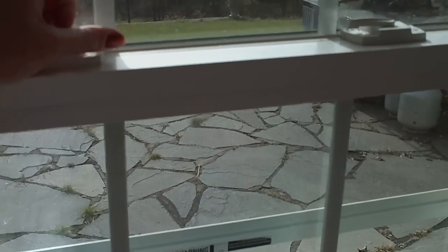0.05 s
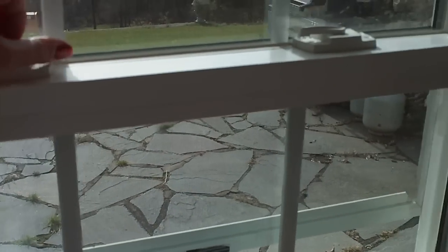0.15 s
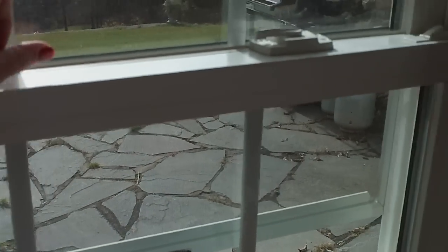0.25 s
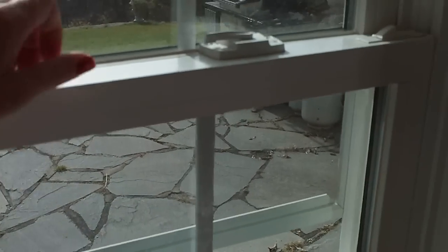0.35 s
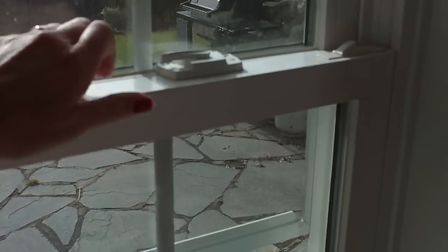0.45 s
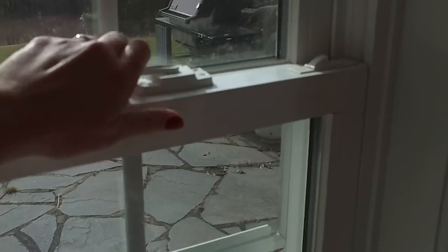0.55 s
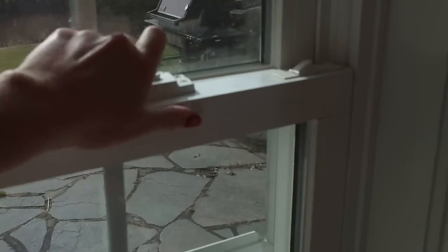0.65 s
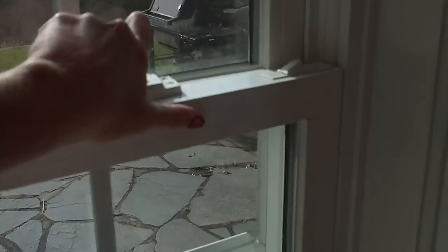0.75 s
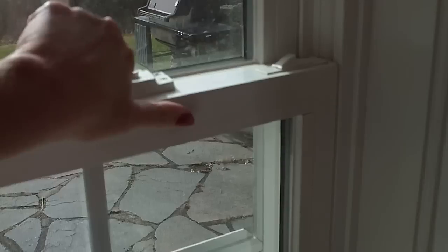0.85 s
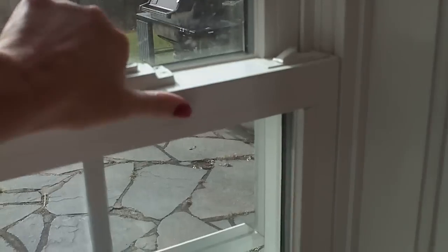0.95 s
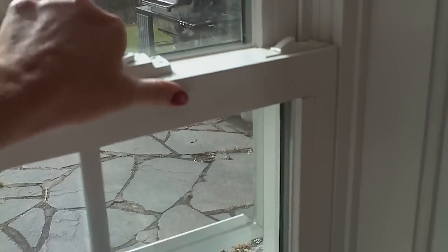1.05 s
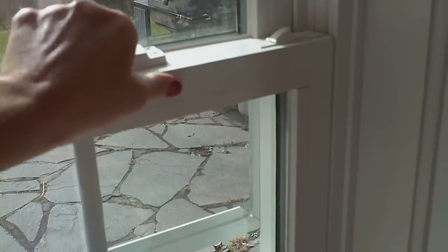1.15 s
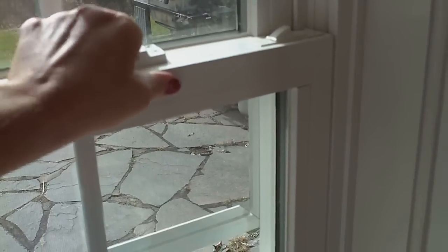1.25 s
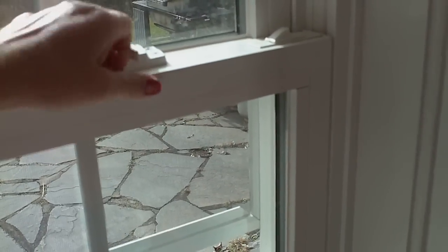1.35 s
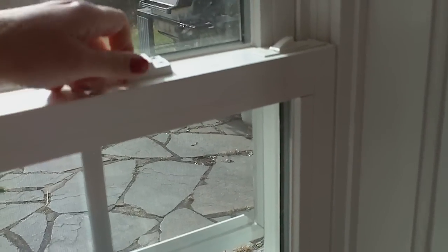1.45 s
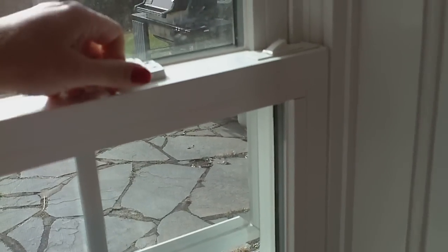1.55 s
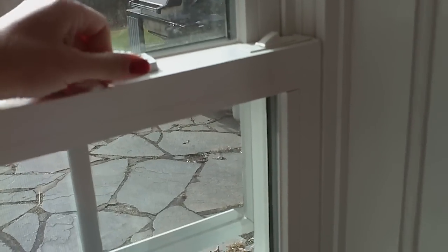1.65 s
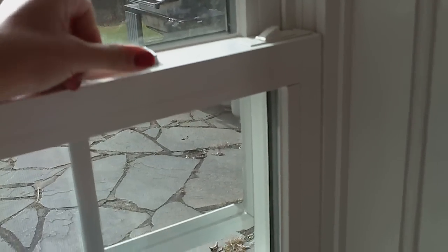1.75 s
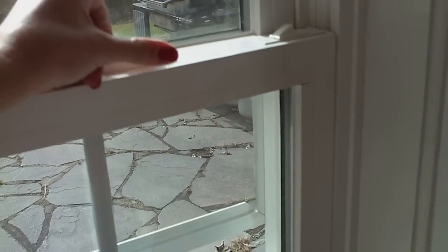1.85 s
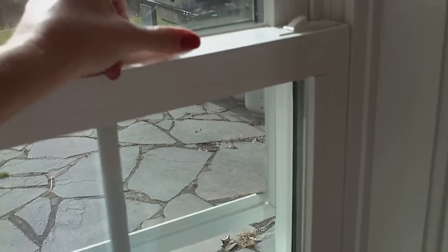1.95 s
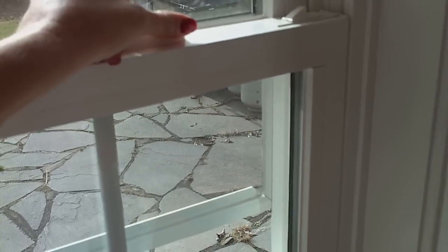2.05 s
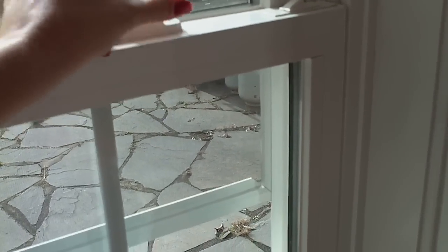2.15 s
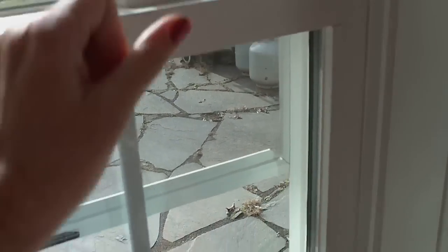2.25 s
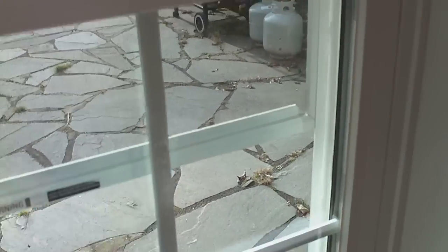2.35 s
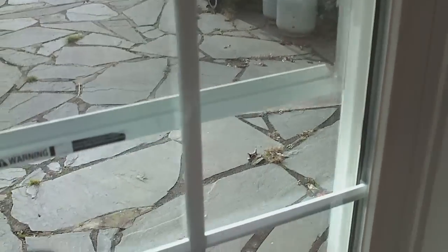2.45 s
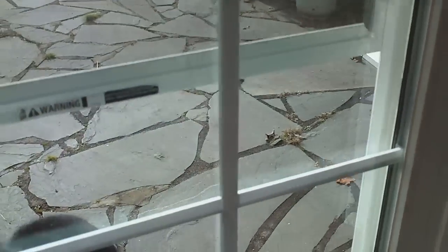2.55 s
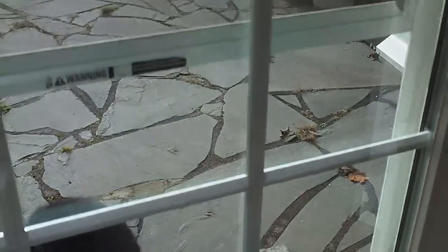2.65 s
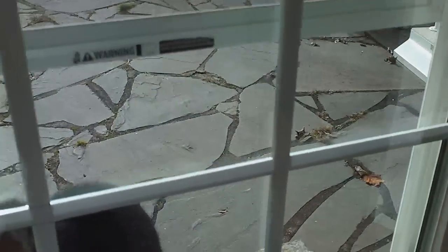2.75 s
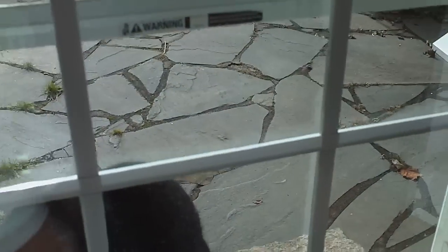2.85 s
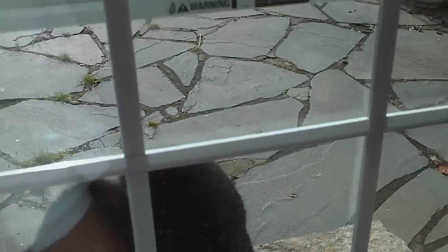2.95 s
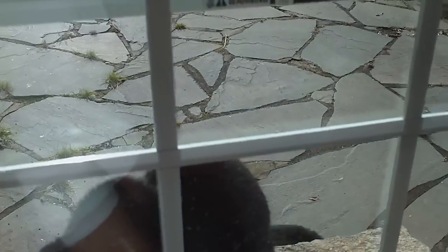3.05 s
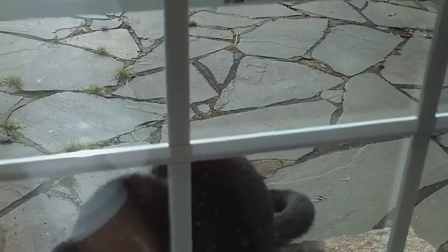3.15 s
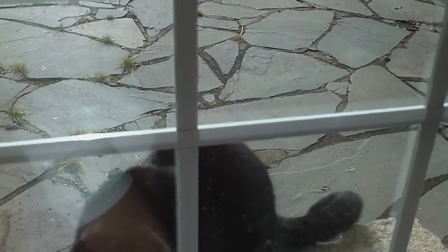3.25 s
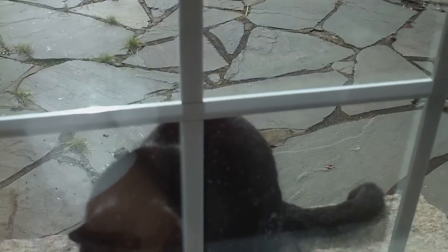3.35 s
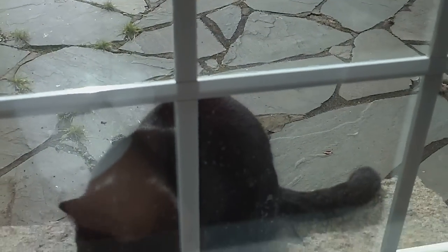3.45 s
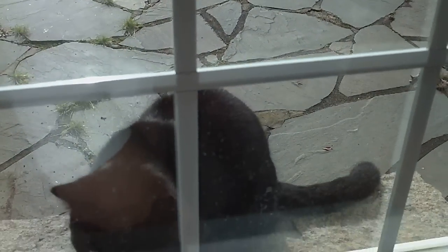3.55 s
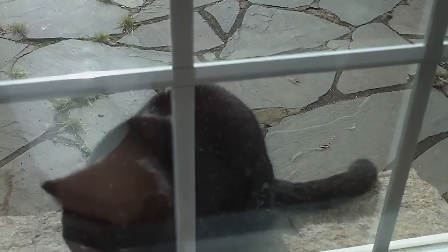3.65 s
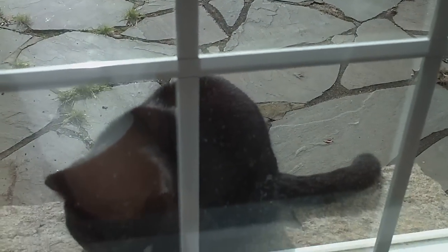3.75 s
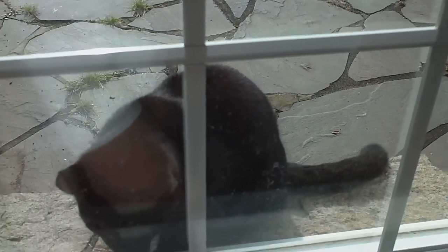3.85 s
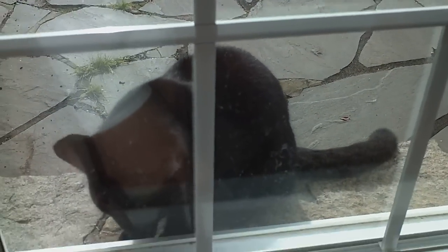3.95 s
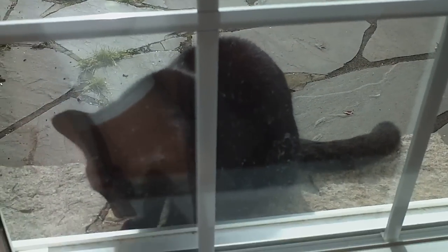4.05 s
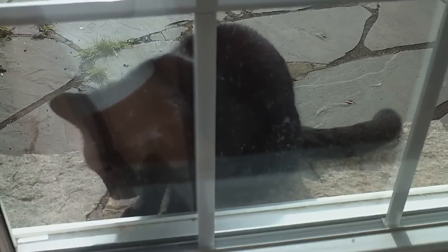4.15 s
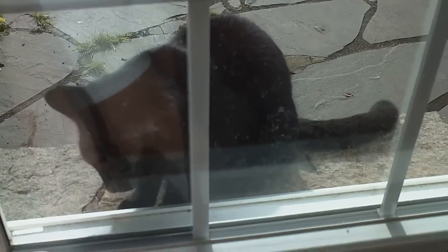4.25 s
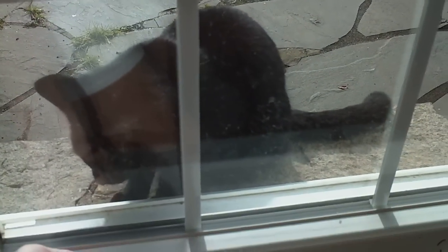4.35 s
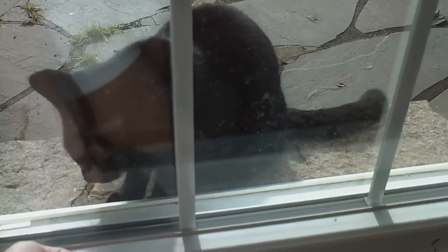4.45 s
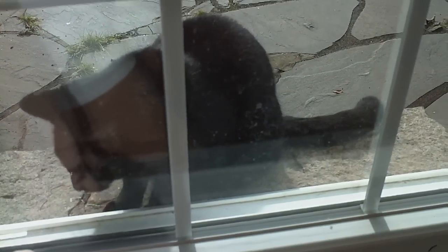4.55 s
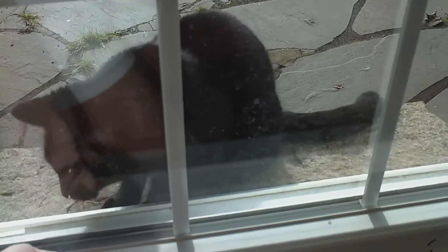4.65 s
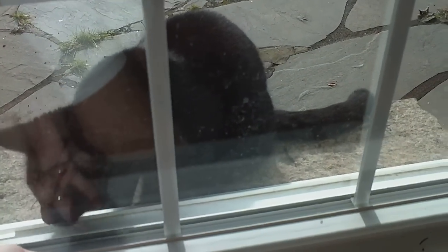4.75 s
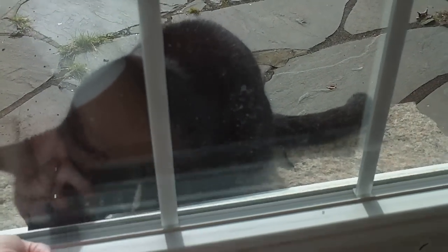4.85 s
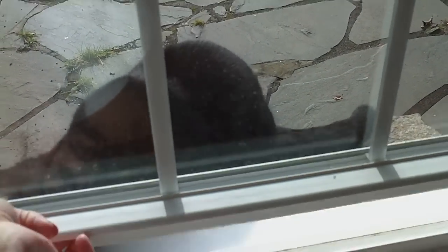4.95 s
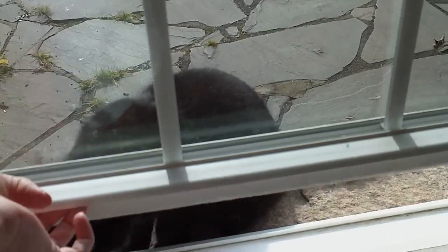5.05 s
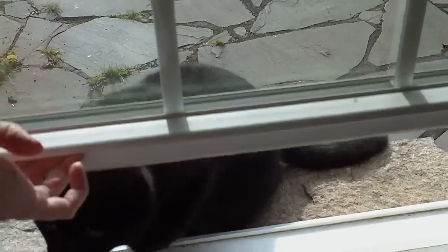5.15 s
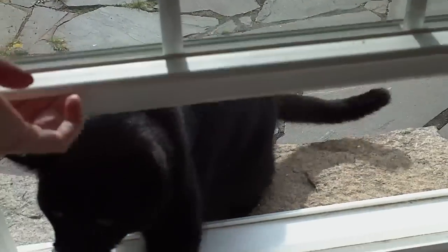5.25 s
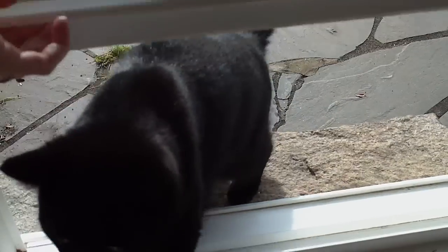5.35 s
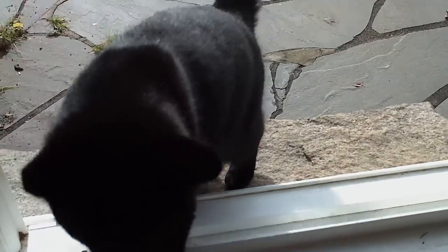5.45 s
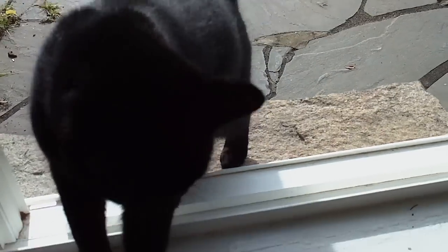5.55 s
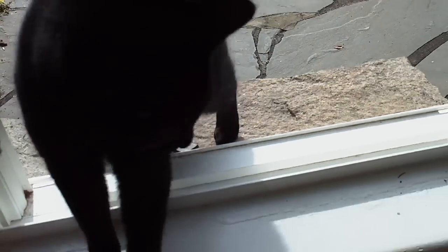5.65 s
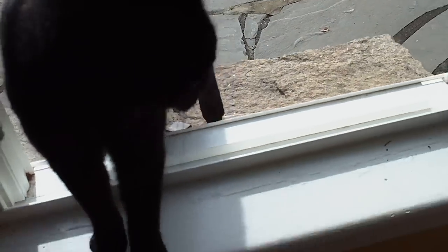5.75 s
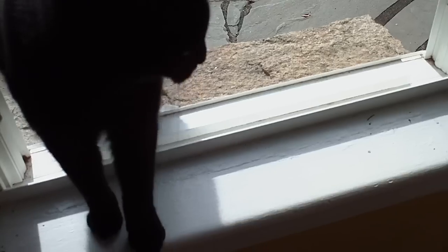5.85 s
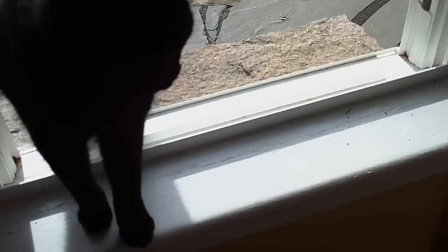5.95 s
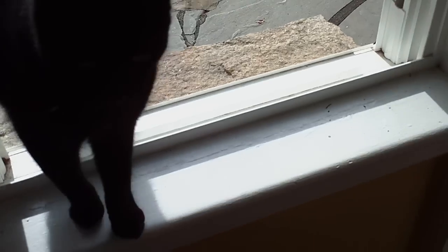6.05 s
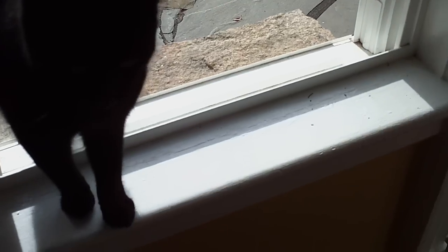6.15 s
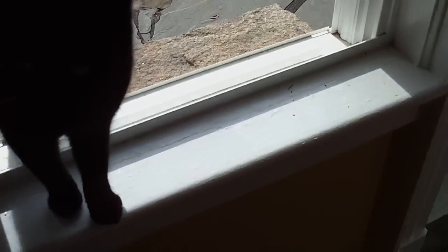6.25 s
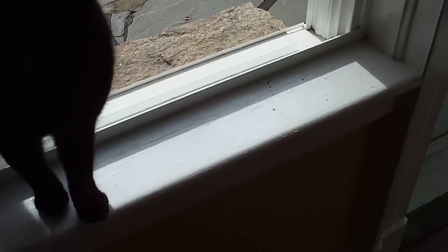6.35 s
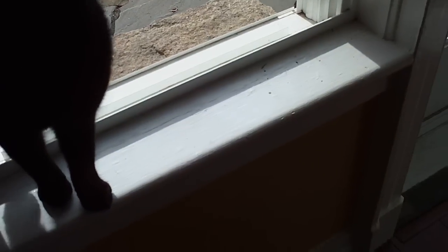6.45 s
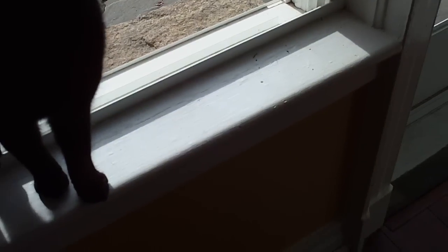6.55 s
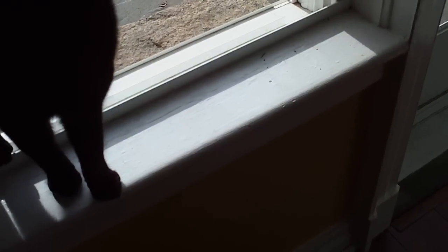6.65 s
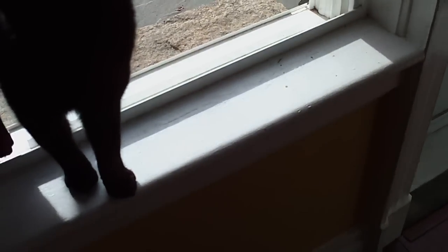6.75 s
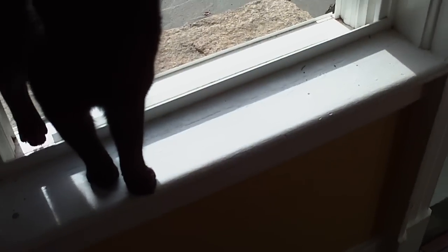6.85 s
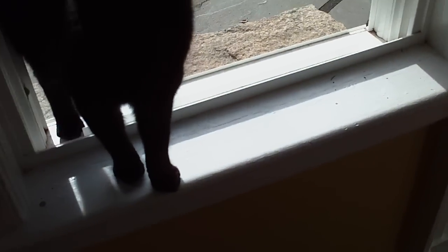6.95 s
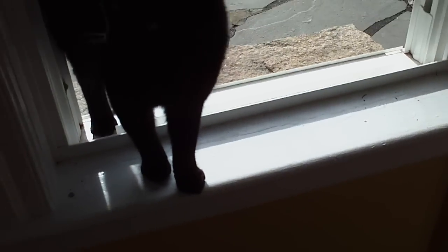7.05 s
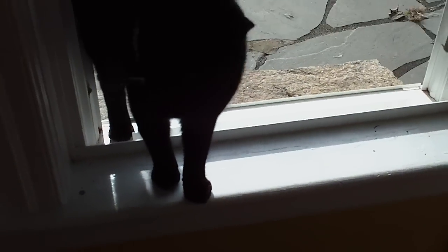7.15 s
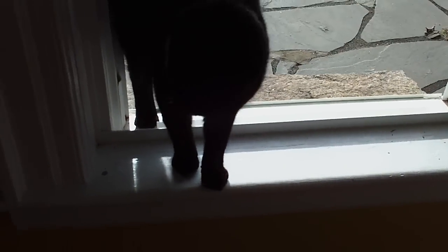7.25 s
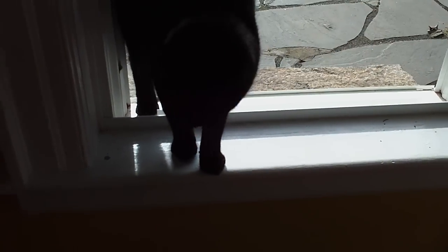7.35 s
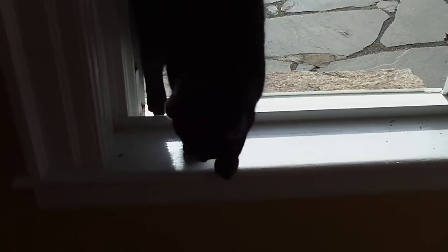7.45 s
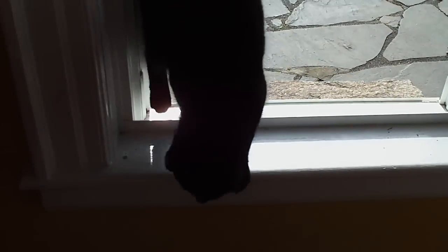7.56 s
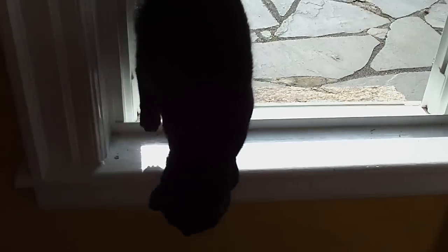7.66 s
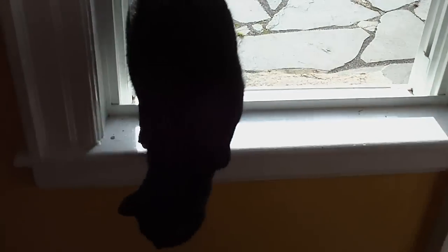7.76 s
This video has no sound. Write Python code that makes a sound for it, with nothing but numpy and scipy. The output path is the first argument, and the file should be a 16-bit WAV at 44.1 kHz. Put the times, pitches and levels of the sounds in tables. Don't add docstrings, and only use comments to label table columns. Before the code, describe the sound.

Close hard clicks, a thump on the frame, a loud clattering window slide, then soft cat scuffs and claw clicks over a low aircraft hum.

```python
import sys
import numpy as np
from scipy import signal
from scipy.fft import rfft, irfft
from scipy.io import wavfile
from scipy.ndimage import uniform_filter1d

SR = 44100
rng = np.random.default_rng(int(sys.argv[2]) if len(sys.argv) > 2 else 0)


def invert_db(level):
    return 10 ** (np.asarray(level, dtype=float) / 20)


def log_audio(samples):
    frames = np.atleast_2d(samples).T
    limited = np.clip(frames, -1, 1)
    pcm = np.round(limited * 32767).astype(np.int16)
    wavfile.write(sys.argv[1], SR, pcm)


N = 343980
LEAD = 2048


def on_log(hz, points):
    f, v = np.transpose(points)
    return np.interp(np.log(np.clip(hz, 1, 6800)), np.log(f), v)


def band(x, lo_hz, hi_hz):
    return signal.sosfilt(signal.butter(2, [lo_hz, hi_hz], "band", fs=SR, output="sos"), x)


def unit(x):
    return x / np.sqrt(np.mean(x ** 2))


def walk(rate_hz):
    k = int(SR / rate_hz)
    levels = np.repeat(rng.standard_normal(N // k + 1), k)
    return uniform_filter1d(levels, k)[:N]


def curves(table):
    s, *columns = np.transpose(table)
    return [np.interp(np.arange(N) / SR, s, c) for c in columns]


def causal(db):
    c = irfft(db * np.log(10) / 20)
    c[1:len(c) // 2] *= 2
    c[len(c) // 2 + 1:] = 0
    return np.exp(rfft(c))


def contacts(events, colour, rings=()):
    out, size = np.zeros(N + LEAD + SR), 16384
    t, hz = np.arange(size) / SR, np.arange(size // 2 + 1) * SR / size
    peaks = sum(invert_db(2 * (db + 2.0)) / (1 + (2 * (hz - f) / width) ** 2) ** 2 for f, width, db in rings)
    part_db = 10 * np.log10(invert_db(2 * on_log(hz, colour)) + peaks)
    for s, peak_db, boom_db, crack_db, chatter_ms in events:
        x = t / (max(chatter_ms, .5) / 1000)
        chance = rng.random((2, size))
        hits = (chance[0] < 0.11) * (chance[1] - .5)
        swarm = rfft(hits * (x + 0.15) ** 1.99 * np.exp(-3.5 * x))
        swarm = swarm / (np.abs(swarm) + 1e-9)
        touch = [(45, boom_db - 13.5), (85, boom_db), (300, boom_db), (1200, 0.0024), (4000, crack_db)]
        hit = irfft(swarm * causal(part_db + on_log(hz, touch))) * np.exp(-t / 0.15)
        at = int(s * SR) + LEAD
        out[at:at + size] += invert_db(peak_db) * hit / np.abs(hit).max()
    return out[:N + LEAD]


def strokes(rows, under_db):
    attack_s, rise_share, fall_db_s = 0.029, 0.24, 146.5
    t = np.arange(N) / SR
    power = 0 * t + np.reshape(invert_db(2 * np.array(under_db)), (-1, 1))
    for s, hold, db, *zones_db in rows:
        rise = np.clip((t - s) / (attack_s + rise_share * hold), 0, 1)
        fall_db = fall_db_s * np.maximum(t - s - attack_s - hold, 0)
        zones = invert_db(np.array([0, *zones_db]))[:, None]
        power = power + (rise * invert_db(db - fall_db) * zones) ** 2
    return power


def rubbing(power, colour):
    scrape_db, hiss_db, rumble_db = 10 * np.log10(power)
    bursts_db = 2.5 * np.minimum(rng.exponential(size=(3, N)), 4)
    grains = rng.standard_normal((3, N)) * invert_db(bursts_db)
    response = irfft(causal(on_log(np.arange(1025) * SR / 2048, colour)))
    shaped = signal.fftconvolve(grains, response[None], axes=1)[:, :N]
    slip = walk(35)
    scrape = unit(band(shaped[0], 600, 2500)) * invert_db(scrape_db + 1.1 * slip)
    hiss = unit(band(shaped[1], 4200, 9000)) * invert_db(hiss_db + 1.3 * slip + 1.2 * walk(25))
    rumble = unit(band(shaped[2], 250, 510)) * invert_db(rumble_db + 2.2 * slip + 0.88 * walk(25))
    return scrape + hiss + rumble


# start_s, peak_db, boom_db, crack_db, chatter_ms
BUMP_HITS = [
    (-.02, -2.5, -6.5, -7.5, 11),
]
# pitch_hz, level_db per Hz
BUMP_COLOUR = [(35, -39), (60, -6), (91, 10.5), (230, -11.5), (410, -7.5), (691, -21), (795, -11.5),
               (2700, -27), (5660, -20), (7200, -26), (9360, -61), (15800, -120)]


def earlier_bump():
    return contacts(BUMP_HITS, BUMP_COLOUR)


# pitch_hz, width_hz, level_db
PANE_MODES = [(30.7, 3.65, -1), (88.8, 3.3, -13.5), (128, 22, -1.5)]
# start_s, peak_db
PANE_THUDS = [(-.02, -14.5), (.117, -26), (0.723, -43), (1.026, -51), (1.151, -37), (1.874, -36),
              (2.058, -18), (4.138, -38.5), (4.49, -41), (4.538, -22.5), (4.882, -26), (4.953, -16),
              (4.996, -17.5)]


def ring(modes, t, scatter_db):
    hz, width, db = np.transpose(modes)[:, :, None]
    chance = rng.standard_normal((3, len(modes), 1))
    wave = np.sin(2 * np.pi * hz * (1 + 0.0095 * chance[0]) * t + chance[1])
    return np.sum(invert_db(db + scatter_db * chance[2]) * np.exp(-np.pi * width * t) * wave, axis=0)


def glass_pane():
    out, t = np.zeros(N + LEAD + SR), np.arange(16384) / SR
    for s, db in PANE_THUDS:
        thud = ring(PANE_MODES, t, 0.54) * (1 - np.exp(-t / 0.0017))
        at = int(s * SR) + LEAD
        out[at:at + len(t)] += invert_db(db) * thud / np.abs(thud).max()
    return out[:N + LEAD]


# pitch_hz, level_db per Hz
HISS_COLOUR = [(15, -39), (25, -10.5), (43, -10), (93, -3), (118, -14), (142, -9.5), (282, -14.5),
               (401, -21.5), (473, -12), (1300, -16.5), (5450, -19), (6900, -24), (8970, -56),
               (15200, -120)]
# start_s, hold_s, level_db
HAND_JERKS = [(0, 0.023, -25), (.95, 0.26, -48), (1.5, 0.28, -47.5), (2.1, 0.1, -42), (2.45, 0.09, -52),
              (4.5, 0.3, -50), (5.05, .04, -33), (5.25, 0.041, -64)]


def camera():
    gain = invert_db(on_log(np.arange(N // 2 + 1) * SR / N, HISS_COLOUR))
    hiss = unit(irfft(rfft(rng.standard_normal(N)) * gain, N)) * invert_db(-50)
    wobble = unit(band(band(rng.standard_normal(N), 24, 40), 22, 42))
    tremor_db = -63.5
    grip = np.sqrt(strokes(HAND_JERKS, [tremor_db])[0])
    return hiss + wobble * grip * invert_db(1.5 * walk(2.3))


# start_s, blade_rate_hz, level_db, overtones_db over it
DRONE = [(0, 97.2, -70.5, 7), (.7, 94.5, -70.5, 14.5), (1.4, 94.3, -62.5, 14.5), (2.4, 94.35, -51, -4.5),
         (2.8, 94.2, -51, 2.5), (3.4, 93.5, -54, -1), (3.9, 92.4, -53, -0.5), (4.3, 91.9, -47.5, -8.5),
         (5.25, 91.5, -41, -2.5), (5.7, 87.1, -45, 1), (5.95, 89.2, -48, 2.5), (6.45, 86.9, -49, 4.5),
         (6.85, 87.7, -48.5, -1), (7.25, 85.1, -44.5, -9), (7.55, 87.9, -47, -9.5), (7.8, 87.2, -42.5, -5)]
# start_s, level_db
ENGINE_NOTE = [(0, -61), (2, -67.5), (4.4, -66.5), (5.6, -47.5), (5.85, -48.5), (6.1, -56), (7.0, -61),
               (7.8, -54)]
OVERTONE_LEVELS = [-7, -9, -21]
OPEN_GAINS = [2.5, 1, 15.5]


def plane():
    hz, level_db, over_db = curves(DRONE)
    phase = 2 * np.pi * np.cumsum(hz) / SR
    opens_s, opening_s, flutter_db = 5.82, 0.12, 1.2
    clear = np.clip((np.arange(N) / SR - opens_s) / opening_s, 0, 1)
    lines = [(1, level_db)]
    for k, (start_db, gain_db) in enumerate(zip(OVERTONE_LEVELS, OPEN_GAINS), 2):
        lines.append((k, level_db + over_db + start_db + gain_db * clear + 1.3 * walk(3.7)))
    lines.append((3 / 2, curves(ENGINE_NOTE)[0]))
    return sum(np.sqrt(2) * invert_db(db + flutter_db * walk(22)) * np.sin(k * phase + k ** 2) for k, db in lines)


# start_s, peak_db, boom_db, crack_db, chatter_ms
LATCH_HITS = [
    (0.1175, -7.5, -2, 2, 7.7),
    (0.1215, 5.5, -10, 5.5, 3.2),
    (0.126, -3.5, -1.5, -5, 2.9),
    (0.529, -37, -16.5, -1.5, 3.1),
]
# pitch_hz, level_db per Hz
LATCH_COLOUR = [(35, -46.5), (60, -32), (286, -19.5), (472, -2.5), (566, -12.5), (705, -2.5), (811, -9.5),
                (1000, 2), (1280, -9), (1700, -3.5), (2250, -11.5), (2750, -22.5), (3400, -18.5),
                (5660, -20), (7200, -37)]
# pitch_hz, width_hz, level_db
LATCH_NOTES = [(700, 18, -1.5), (952, 53, 1), (1100, 50, -8.5), (1740, 100, -10), (2230, 150, -14.5),
               (4320, 100, -20)]


def first_latch():
    return contacts(LATCH_HITS, LATCH_COLOUR, LATCH_NOTES)


# start_s, hold_s, scrape_db, hiss_db over scrape, rumble_db over scrape
HAND_RUBS = [(.3, 0.034, -48.5, -17, -23), (.66, 0.04, -58, 1, 15), (.97, 0.092, -46, -10.5, -7),
             (1.3, 0.3, -55, -1.5, -5), (2.2, 0.8, -68, 1, 12), (3.42, 0.2, -61, -3.5, 9),
             (4.53, 0.044, -47, 16, -21), (4.8, 0.12, -58, 16.5, 2)]
# start_s, scrape_db
SASH_SLIDE = [(4.8, -77), (4.9, -19.5), (5.16, -33.5), (5.3, -34.5), (5.41, -33.5), (5.48, -35.5),
              (5.56, -33.5), (5.62, -36), (5.76, -38.5), (5.85, -51), (6.25, -51.5)]
# scrape_db, hiss_db, rumble_db
SLIDE_ZONES = [0.5, -0.5, -6]
# scrape_db, hiss_db, rumble_db
FIDGET = [-71.5, -57.5, -56.5]
# pitch_hz, level_db per Hz
TRACK_COLOUR = [(120, -44.5), (200, -1), (472, -1), (730, -7.5), (986, -2.5), (2000, -16), (2420, -13),
                (3440, -24.5), (4500, -27.5), (5100, -28), (5650, -25), (6570, -26.5), (7300, -38.5)]


def hands_and_slide():
    slide_db = curves(SASH_SLIDE)[0] + np.array(SLIDE_ZONES)[:, None]
    return rubbing(strokes(HAND_RUBS, FIDGET) + invert_db(2 * slide_db), TRACK_COLOUR)


# start_s, peak_db, boom_db, crack_db, chatter_ms
FINGER_HITS = [
    (0.704, -50, 14, 11, 7.6),
    (0.726, -34, -19, 6, 7.2),
    (0.854, -41, 27, -10, 12),
    (1.534, -30, 16, -1, 9.7),
    (1.6, -39.5, 2, -10.5, 8.3),
]
# pitch_hz, level_db per Hz
SKIN_COLOUR = [(88, -38), (150, -14), (270, -5), (335, -11), (414, 3.5), (596, -16.5), (1190, -14),
               (3000, -33), (3900, -59), (6600, -120)]


def fingers():
    return contacts(FINGER_HITS, SKIN_COLOUR)


# start_s, peak_db, boom_db, crack_db, chatter_ms
CAM_HITS = [(0.974, -31, -7, -10.5, 4.3), (0.985, -25, -7.5, -9, 8), (1.011, -30, -11, 0.5, 7.6),
            (1.023, -30.5, -8, 12.5, 6.1), (1.051, -27, -7, 15.5, 5.5), (1.1558, 1.5, -6.5, -2.5, 3.5),
            (1.1585, 0.5, -6.5, 5, 5), (1.163, -9, -7.5, -11, 5), (1.169, -9.5, 4, -12.5, 5.7)]
# pitch_hz, level_db per Hz
CAM_COLOUR = [(35, -54), (60, -8), (123, -4.5), (234, -16.5), (402, -0.5), (625, -16.5), (719, -13),
              (1070, -12), (2120, -21), (2390, -23), (2750, -29), (5780, -21), (7200, -36), (9360, -72.5),
              (15800, -120)]
# pitch_hz, width_hz, level_db
CAM_NOTES = [(205, 120, -10.5), (405, 70, -4.5), (1050, 200, -12.5), (1420, 120, -12), (2330, 130, -22)]


def second_latch():
    return contacts(CAM_HITS, CAM_COLOUR, CAM_NOTES)


# start_s, peak_db, boom_db, crack_db, chatter_ms
TICK_HITS = [
    (1.843, -31, 15, 0, 8.3),
    (1.874, -20.5, 6.5, 0.5, 6.2),
    (1.93, -13, 0, -3.7, 9.3),
]
# pitch_hz, level_db per Hz
RAIL_COLOUR = [(35, -51.5), (60, -10.5), (234, -11.5), (270, -6.5), (664, -10.5), (933, -2.5), (1140, -9.5),
               (1740, -6), (2870, -26.5), (7200, -28), (9360, -55), (15800, -120)]


def rail_ticks():
    return contacts(TICK_HITS, RAIL_COLOUR)


# start_s, peak_db, boom_db, crack_db, chatter_ms
THUMP_HITS = [
    (2.0465, -11, 12, 13.5, 6.7),
    (2.0545, -6, -3, 16, 4.3),
    (2.0595, -5.5, 0, 5, 5),
]
# pitch_hz, level_db per Hz
FRAME_COLOUR = [(35, -43.5), (60, 8), (239, -6.5), (410, -1), (589, -10.5), (1000, -7), (1700, -7.5),
                (2050, -15), (2460, -12), (2850, -24), (3600, -23), (5120, -20.5), (6000, -22), (7200, -42)]
# pitch_hz, width_hz, level_db
FRAME_NOTES = [(200, 54, -4), (268, 17, -15), (417, 34, -12), (2485, 100, -15), (3540, 300, -20.5)]


def rail_thumps():
    return contacts(THUMP_HITS, FRAME_COLOUR, FRAME_NOTES)


# start_s, peak_db, boom_db, crack_db, chatter_ms
SILL_TAPS = [(2.698, -31, 11.5, -4, 16), (2.997, -35, 3, 1.5, 8.4), (3.22, -32, -7.5, 12, 20),
             (3.5295, -19.5, 0, -4, 7.1), (3.54, -26.5, 5, -8, 10), (3.615, -35, -7.5, 5, 30),
             (3.759, -34, 3, -20, 1.4), (3.8115, -30.5, 3, -6.5, 5.7), (3.835, -36, 4, 2.5, 8.7),
             (4.101, -32.5, 13, -2.5, 15), (4.135, -26, 8, -2, 12.5), (4.142, -29, -4.5, 4, 6),
             (4.333, -39, 8, -14.5, 13), (7.009, -35.5, -1, -9, 7.1)]
# pitch_hz, level_db per Hz
SILL_COLOUR = [(88, -63), (150, -6), (384, -6.5), (505, 4), (585, -5.5), (982, 4), (1340, -4), (2680, -11),
               (5650, -12), (7200, -19), (9360, -67), (15800, -120)]
# pitch_hz, width_hz, level_db
SILL_NOTES = [(5700, 350, -5)]


def sill_taps():
    return contacts(SILL_TAPS, SILL_COLOUR, SILL_NOTES)


# start_s, peak_db, boom_db, crack_db, chatter_ms
SEAL_HITS = [(4.4915, -13.5, 5.5, -2.5, 6.3), (4.497, -16.5, 12, -5, 23), (4.511, -10.5, -1, 0, 10),
             (4.5205, -3, -5, -7.5, 13), (4.527, -7, -3.5, -9.5, 4.9), (4.532, -2, -7.5, -2, 7.8),
             (4.5385, 5.5, -7.5, 8.5, 3.1), (4.5425, -3.5, -18.5, 5, 2.6), (4.548, -25.5, -2, 8.5, 5.4),
             (4.765, -22.5, 4, -13.5, 37), (4.776, -23, -3, -7, 3.6), (4.782, -3.5, -3, 7, 3.3),
             (4.804, -13.5, -11.5, -6, 12), (4.863, -7, -12, 0.5, 3)]
# pitch_hz, level_db per Hz
SEAL_COLOUR = [(35, -17.5), (60, -5), (281, -3.5), (350, -19), (445, 3), (601, -8), (900, -1), (1300, -5),
               (2000, -8), (3000, -9), (4400, -5.5), (7200, -6), (9360, -52.5), (15800, -120)]


def seal_pops():
    return contacts(SEAL_HITS, SEAL_COLOUR, [(5530, 1000, 0.0031)])


# start_s, peak_db, boom_db, crack_db, chatter_ms
BANG_HITS = [(4.8795, 4.5, 3, 5, 4.6), (4.8825, 8, -1.5, 2, 6.6), (4.887, 5, 2, -0.5, 8.9),
             (4.893, -1, 2.5, -3.5, 7.7), (4.904, -10.5, -4.5, -10, 6), (4.938, -12.5, -6, 2, 15),
             (4.948, -2, -8.5, 10.5, 6.9), (4.9535, 7, -8.5, -4, 6.4), (4.958, 4.5, 2, 0.5, 4),
             (4.9625, 6, -6.5, 4, 4), (4.970, 0, -4, -6, 5), (4.976, -4, 9, -6.5, 5.5),
             (4.994, -5.5, -3.5, -4.5, 8), (5.026, -15.5, -6, -2, 10)]
# pitch_hz, level_db per Hz
SASH_COLOUR = [(35, -45.5), (60, -17.5), (167, -9.5), (200, -19.5), (298, -9), (533, -9), (828, -2),
               (1240, -9), (1420, -3), (2080, -9), (3200, -11.5), (4700, -12.5), (5890, -9.5), (7200, -16)]
# pitch_hz, width_hz, level_db
SASH_NOTES = [(205.5, 33, -4.5), (495, 85, -0.5), (650, 27, -9), (960, 34, -3.5), (1060, 80, -4),
              (1640, 40, -12), (1866, 130, -9), (4610, 140, -8), (4940, 100, -20), (5770, 170, -14)]


def sash_bangs():
    return contacts(BANG_HITS, SASH_COLOUR, SASH_NOTES)


# start_s, peak_db, boom_db, crack_db, chatter_ms
SETTLE_HITS = [
    (5.225, -27, -5, -6, 3.1),
    (5.397, -17.5, -0.5, -6.5, 4.1),
    (5.560, -21.5, 4.5, -8.5, 4.5),
    (5.902, -27.5, -3, 8, 18),
    (5.922, -23, -8.5, 6.5, 10),
    (5.95, -38, -1, 5, 6.5),
]
# pitch_hz, level_db per Hz
RUNNER_COLOUR = [(100, -23), (300, -9.5), (980, 1.5), (1800, -4.5), (3000, -10.5), (4200, -14.5),
                 (5700, -14.5), (7200, -16)]


def sash_settles():
    return contacts(SETTLE_HITS, RUNNER_COLOUR)


# start_s, hold_s, scrape_db, hiss_db over scrape, rumble_db over scrape
PAW_SCUFFS = [
    (6.61, 0.018, -48.5, -1.5, -7),
    (6.74, 0.027, -65.5, 15.5, 1),
    (6.99, 0.14, -54.5, -14, 4),
    (7.22, 0.14, -43.5, -14.5, -10.5),
    (7.27, 0.12, -51.5, 11, -20),
]
# scrape_db, hiss_db, rumble_db
SHUFFLE = [-57.5, -57, -53.5]
# pitch_hz, level_db per Hz
CLOTH_COLOUR = [(120, -67), (200, -10), (265, -4), (312, -4.5), (336, -10), (770, -5), (1500, -1),
                (3500, -3.5), (5600, -4.5), (6900, -7.5)]


def paws_and_cloth():
    return rubbing(strokes(PAW_SCUFFS, SHUFFLE), CLOTH_COLOUR)


# start_s, peak_db, boom_db, crack_db, chatter_ms
CLAW_HITS = [
    (6.2585, -6.5, -3, 4.5, 3.9),
    (6.265, -14, 5.5, -11.5, 2.5),
    (6.269, -17, 8.5, -11, 2.5),
    (6.392, -26.5, 14, 1.5, 7.4),
]
# pitch_hz, level_db per Hz
STOOL_COLOUR = [(88, -43), (150, -18.5), (332, -14), (770, -19.5), (966, -13), (1450, -12.5), (1900, -16),
                (2430, -14), (2900, -25.5), (5500, -24), (6750, -20), (7200, -10)]
# pitch_hz, width_hz, level_db
STOOL_NOTES = [(527, 81, -12.5), (980, 160, -10.5), (1420, 110, -15), (2240, 230, -10.5),
               (6800, 300, -24.5)]


def cat_claws():
    return contacts(CLAW_HITS, STOOL_COLOUR, STOOL_NOTES)


# pitch_hz, fall_s
ECHO_FALL = [(100, 0.39), (500, 0.53), (2000, 0.66), (6000, 0.59)]
# pitch_hz, level_db
ECHO_COLOUR = [(60, -5.5), (300, 6.5), (700, 4), (1400, 0), (2800, -1.5), (5600, -2)]


def room(x):
    level_db, gap_s, early_db, early_s = -7.5, 0.0011, 0.5, 0.028
    t, tail = np.arange(SR) / SR, 0
    for hz in 44 * 2. ** np.arange(8):
        noise = unit(band(rng.standard_normal(SR), hz / np.sqrt(2), hz * np.sqrt(2))) * np.sqrt(hz)
        tail = tail + noise * invert_db(on_log(hz, ECHO_COLOUR) - 60 * t / on_log(hz, ECHO_FALL))
    tail = tail * np.clip((t - gap_s) / 0.0014, 0, 1) * (1 + invert_db(early_db) * np.exp(-t / early_s))
    modes = rfft(tail)
    size = np.abs(modes)
    tail = irfft(modes * (uniform_filter1d(size, size=60) / size) ** .5, SR)
    tail = tail * np.clip(4 - 5 * t, 0, 1) ** 2
    return invert_db(level_db) * signal.fftconvolve(x, tail / np.sqrt(np.sum(tail ** 2)))[:len(x)]


def scene():
    near = earlier_bump() + glass_pane() + first_latch() + fingers() + second_latch()
    near = near + rail_ticks() + rail_thumps() + sill_taps()
    near = near + seal_pops() + sash_bangs() + sash_settles()
    left = np.clip((np.arange(N) / SR - 6.25) / .2, 0, 1)
    rub = (1 - left) * hands_and_slide() + left * paws_and_cloth()
    rub = np.concatenate([np.zeros(LEAD), rub])
    claws = cat_claws()
    heard = near + claws + 0.69 * rub + room(near + 1.07 * claws + 0.21 * rub)
    return (heard[LEAD:] + plane() + camera())[None]


def top_cut(x):
    return signal.sosfilt(signal.butter(12, 7460, fs=SR, output="sos"), x)


def record(dry):
    knee = 1.85
    top_hz, spare_hz, spare_db = 6985, 7333, -7
    spare_loud_db, spare_share = -40, 0.45
    size = N + 2 * LEAD
    spectrum = rfft(np.pad(knee * np.tanh(dry[0] / knee), LEAD, "reflect"))
    hz = np.arange(size // 2 + 1) * SR / size
    main = irfft(spectrum * (hz < top_hz), size)[LEAD:-LEAD]
    spare = irfft(spectrum * ((hz >= top_hz) & (hz < spare_hz)), size)[LEAD:-LEAD]
    loud = uniform_filter1d(main ** 2, size=1024)[::1024] > invert_db(2 * spare_loud_db)
    kept = np.repeat(loud | (rng.random(N // 1024 + 1) < spare_share), 1024)[:N]
    dull = main + invert_db(spare_db) * spare * uniform_filter1d(1. * kept, size=512)
    return top_cut(np.clip(dull, -1, 1)[None])


dry = scene()
out = record(dry)
log_audio(out)
```